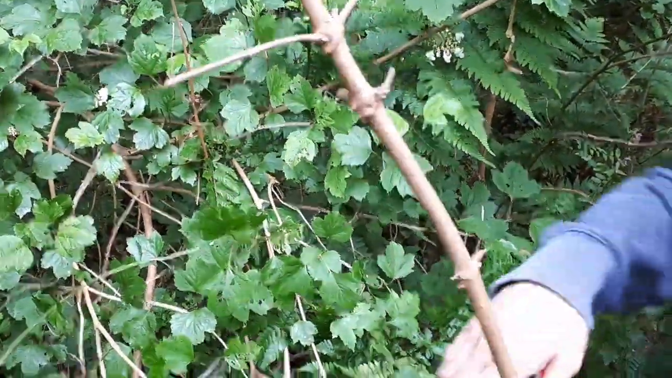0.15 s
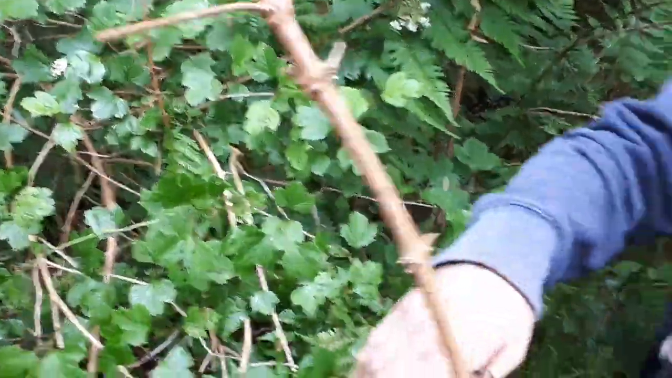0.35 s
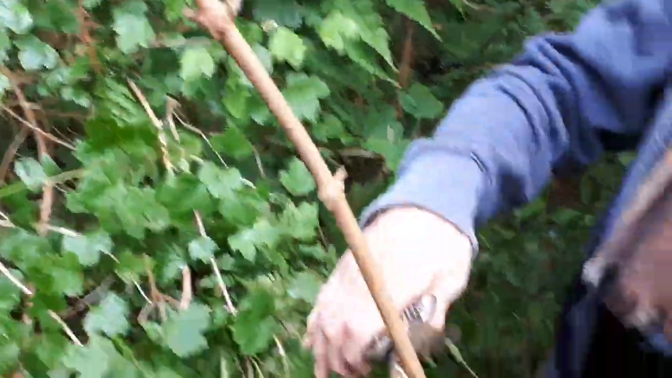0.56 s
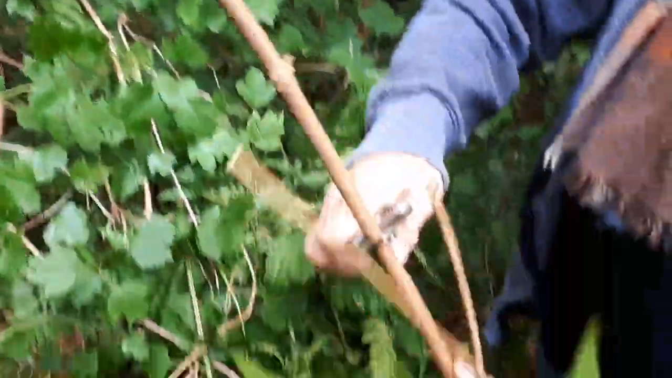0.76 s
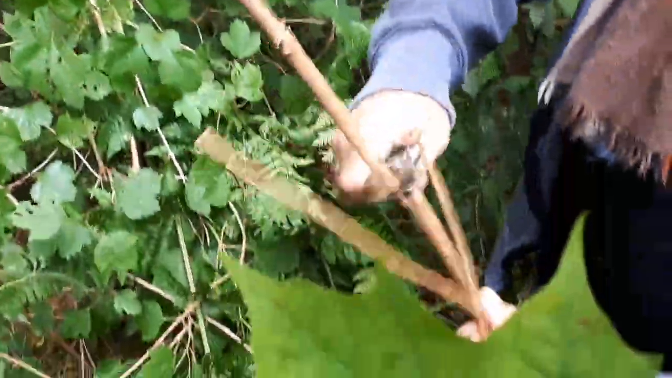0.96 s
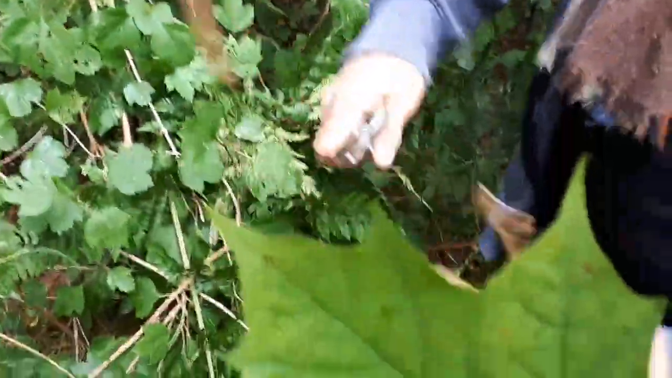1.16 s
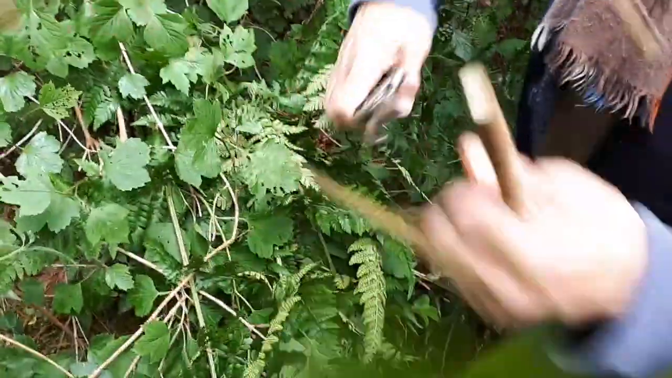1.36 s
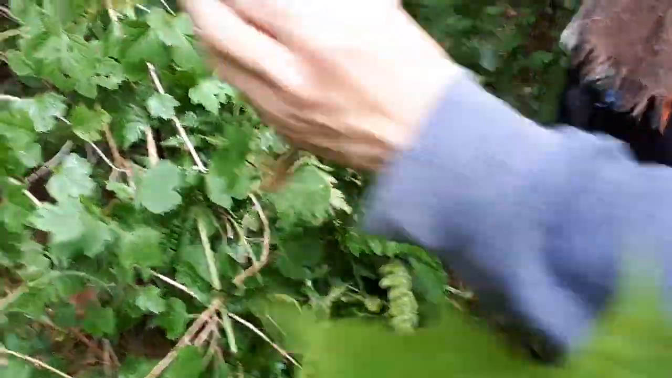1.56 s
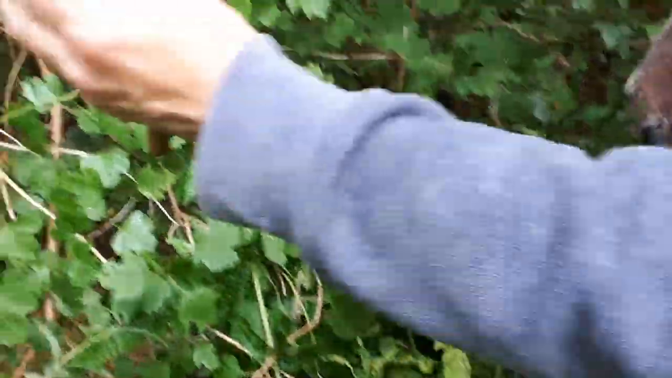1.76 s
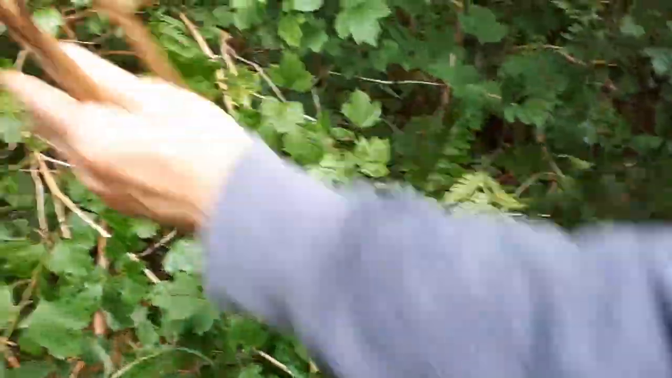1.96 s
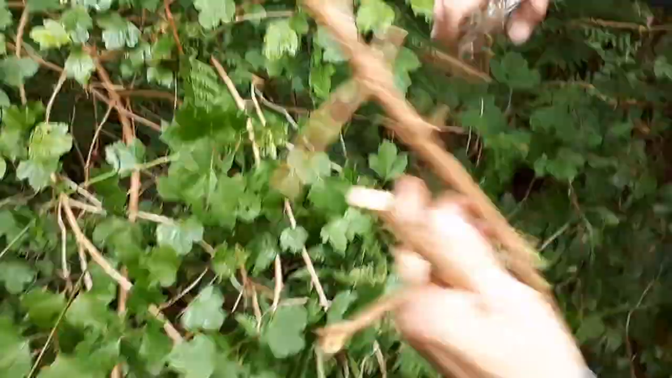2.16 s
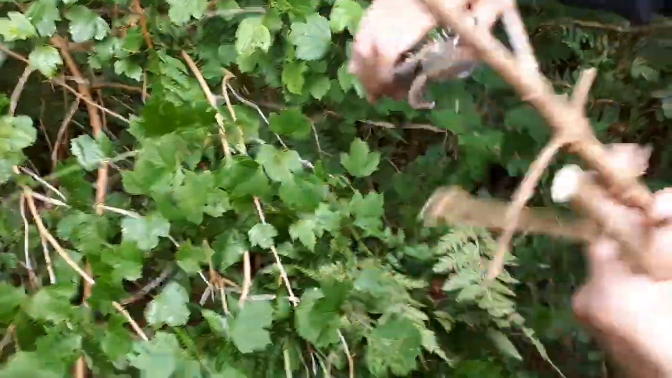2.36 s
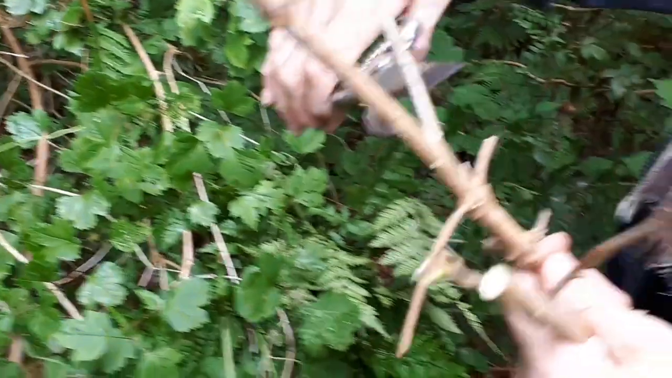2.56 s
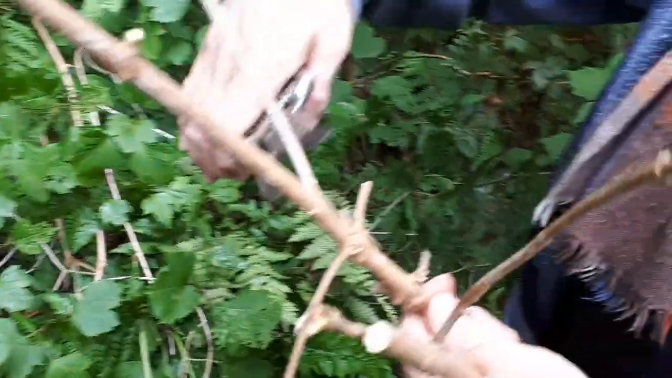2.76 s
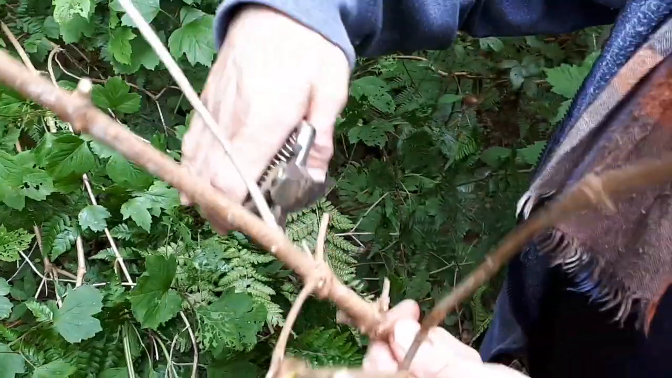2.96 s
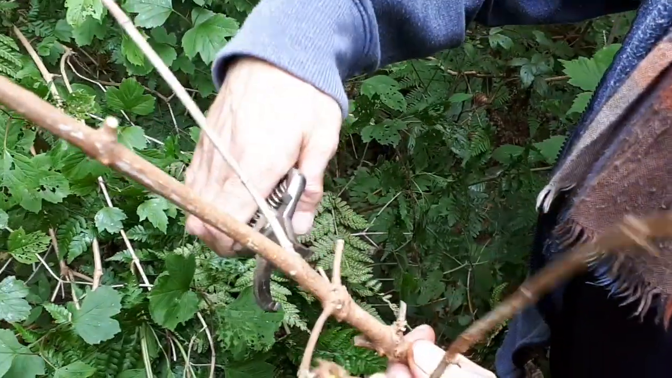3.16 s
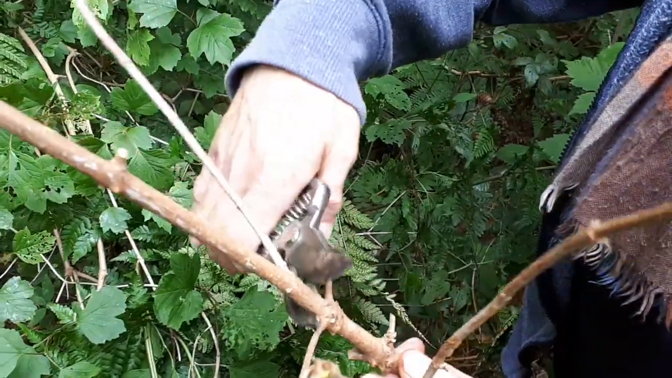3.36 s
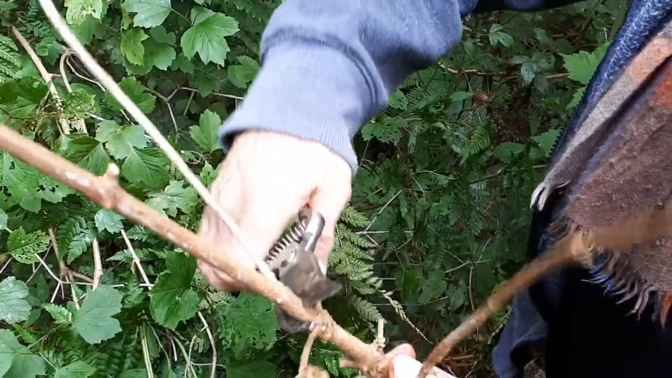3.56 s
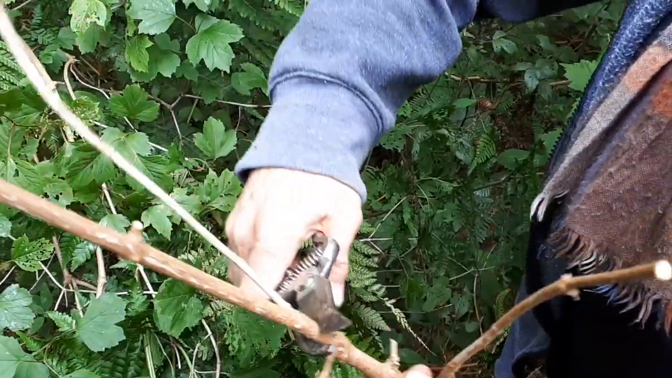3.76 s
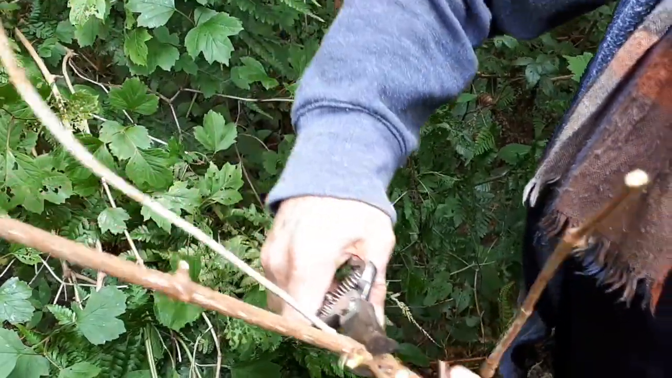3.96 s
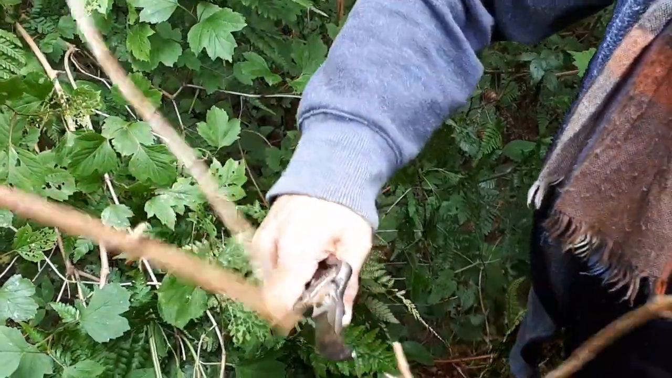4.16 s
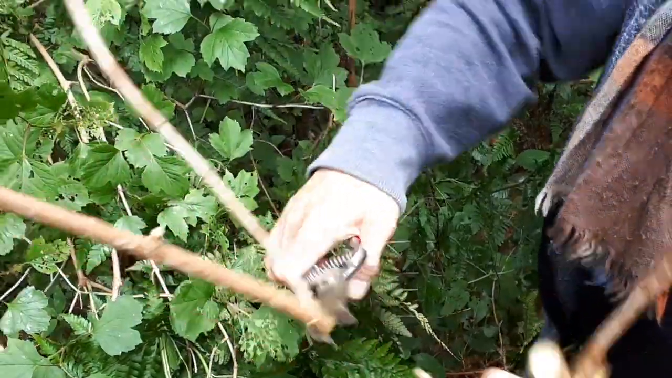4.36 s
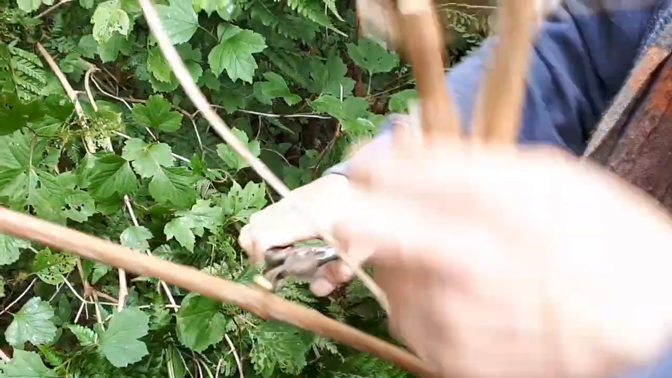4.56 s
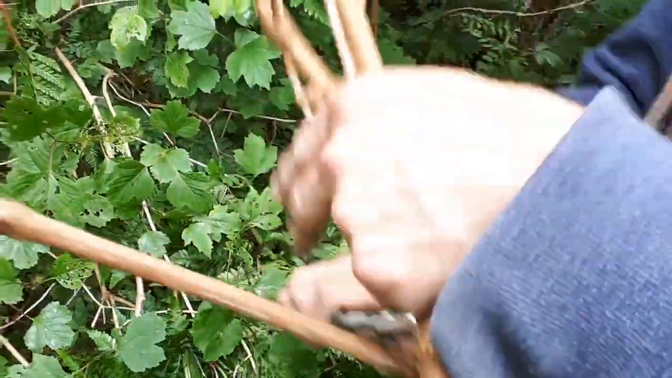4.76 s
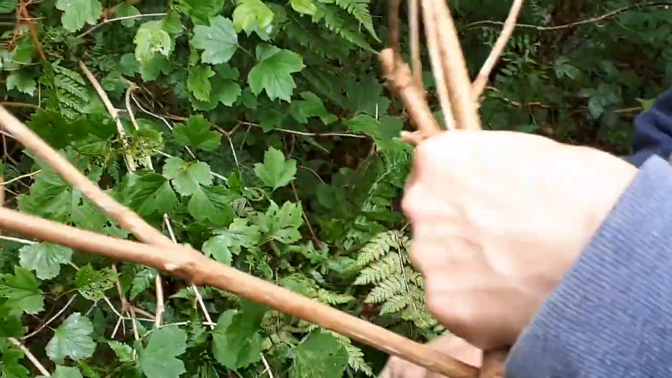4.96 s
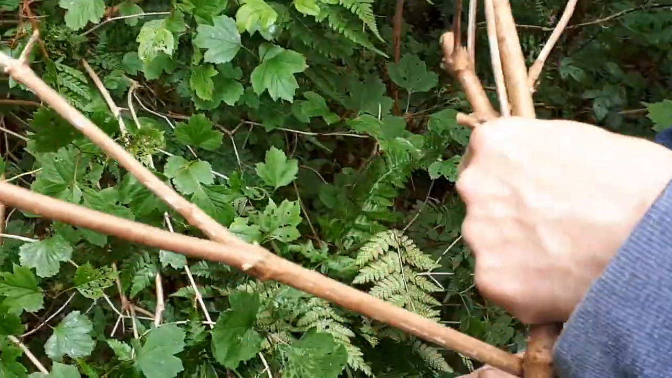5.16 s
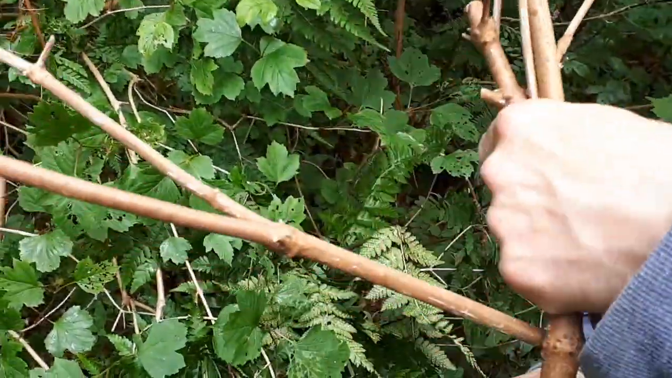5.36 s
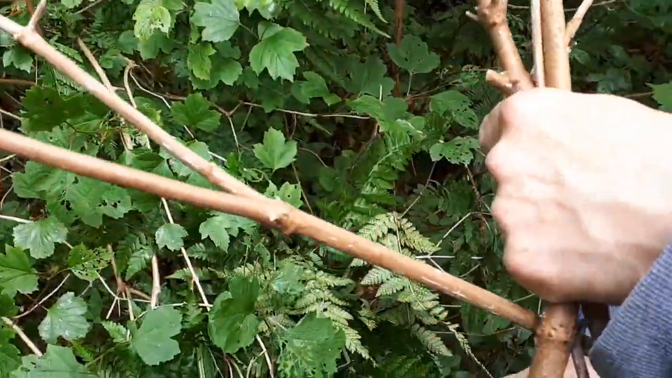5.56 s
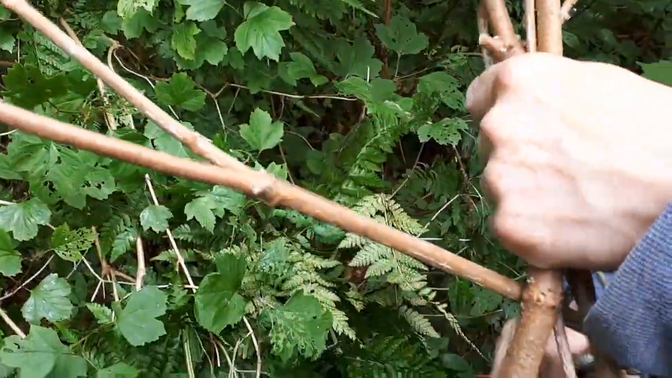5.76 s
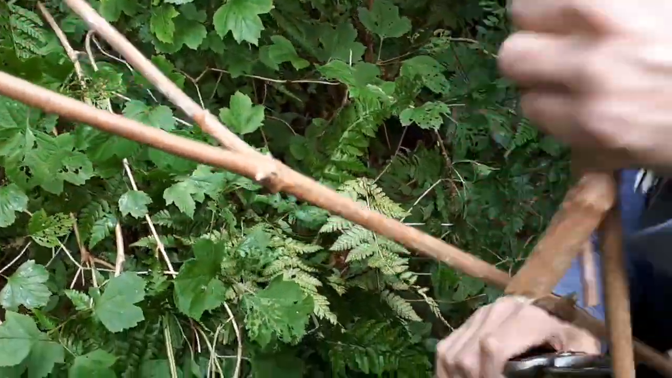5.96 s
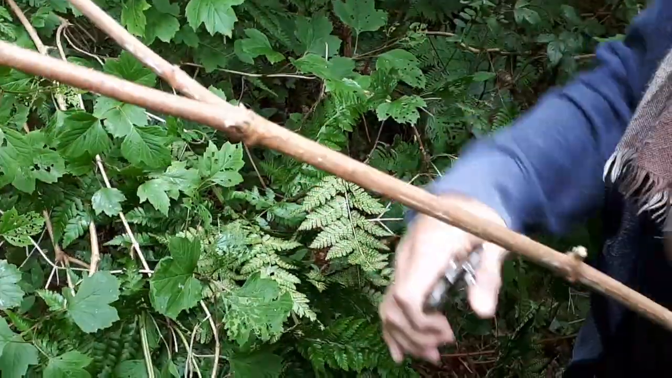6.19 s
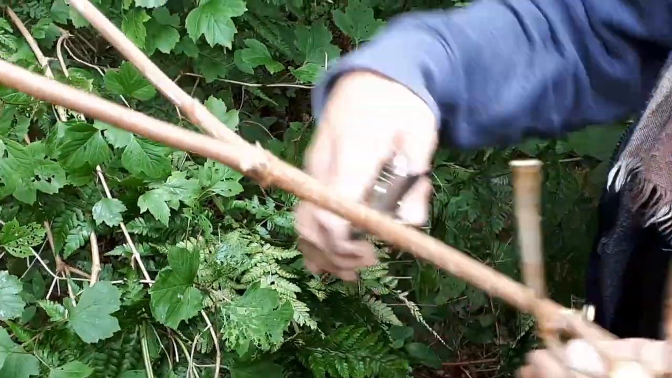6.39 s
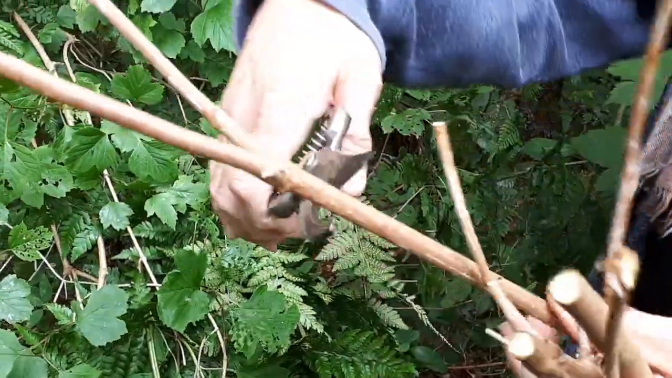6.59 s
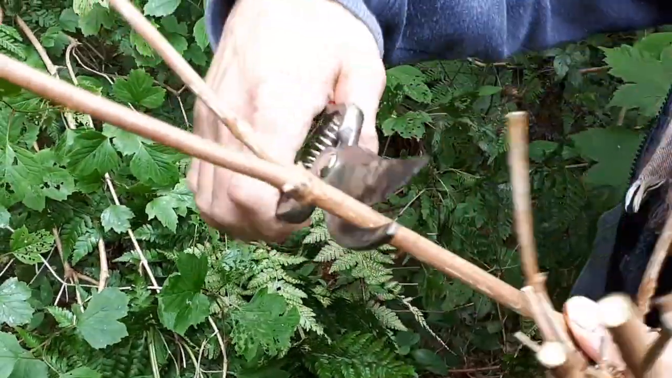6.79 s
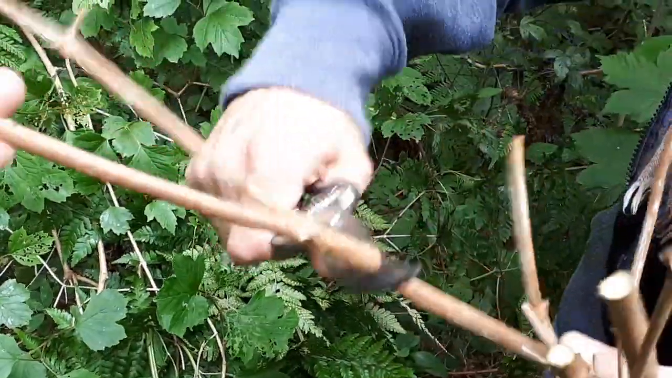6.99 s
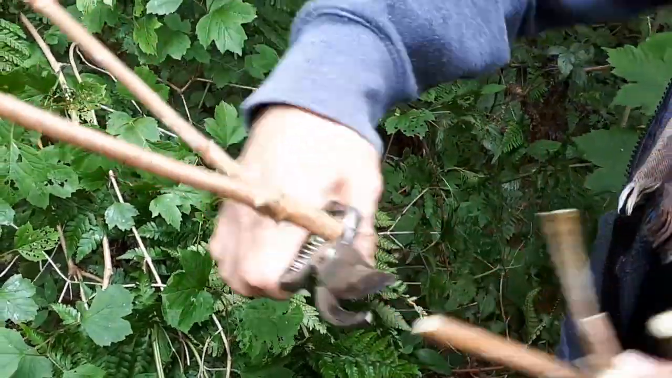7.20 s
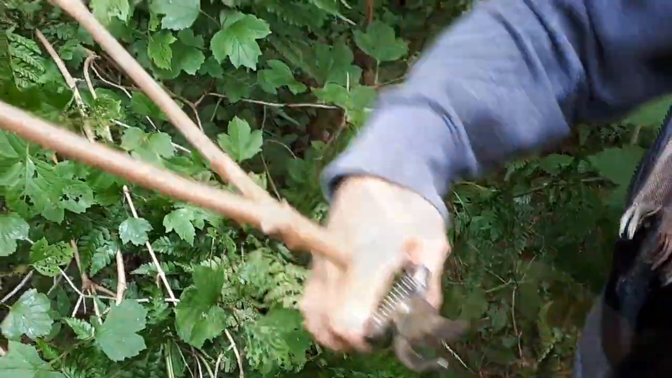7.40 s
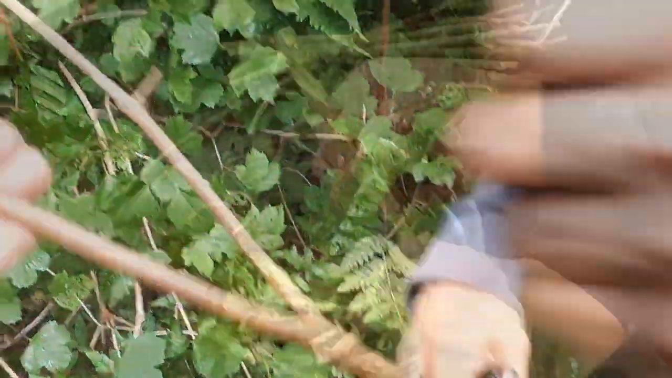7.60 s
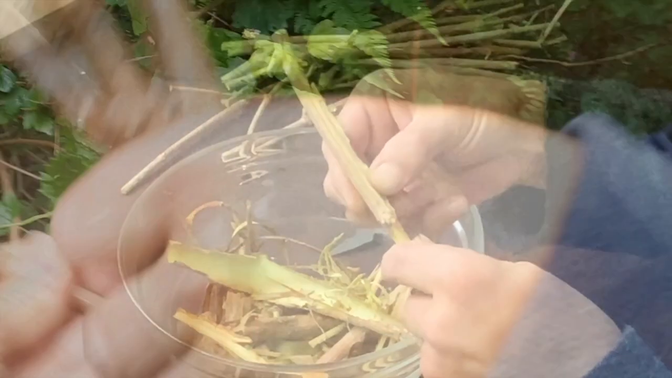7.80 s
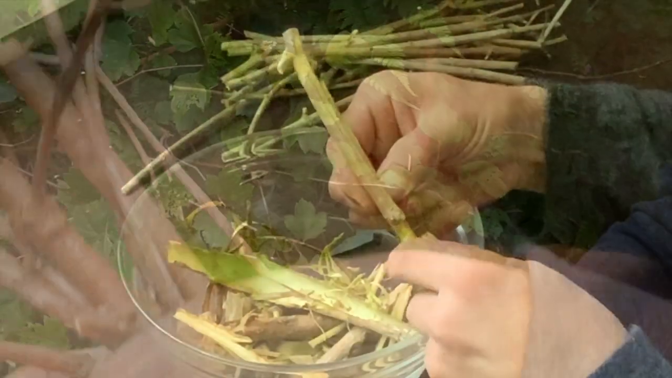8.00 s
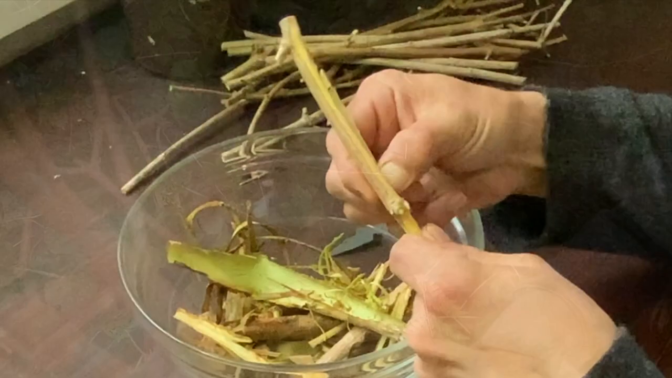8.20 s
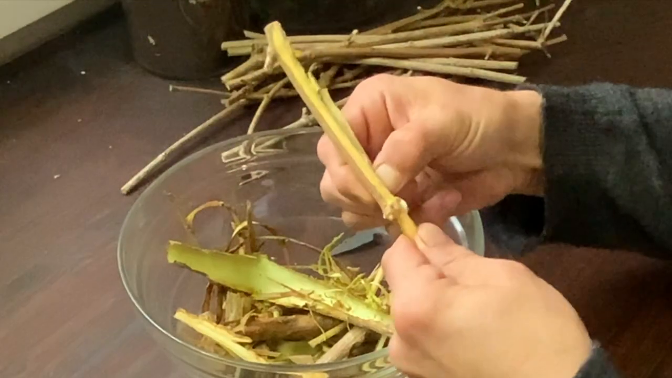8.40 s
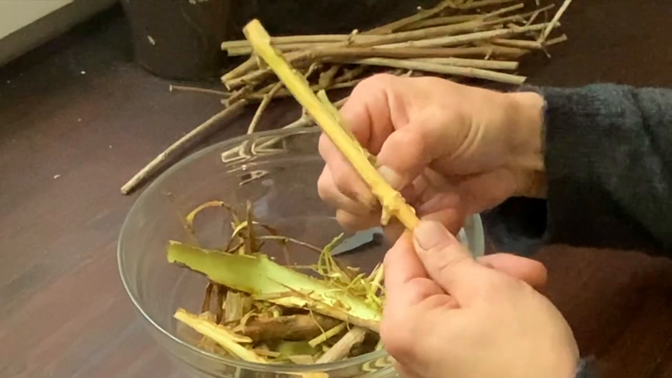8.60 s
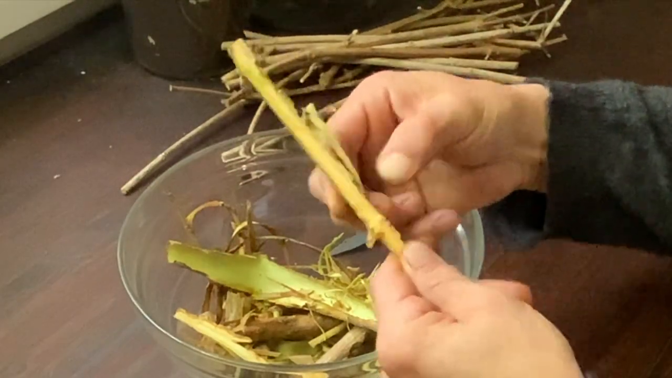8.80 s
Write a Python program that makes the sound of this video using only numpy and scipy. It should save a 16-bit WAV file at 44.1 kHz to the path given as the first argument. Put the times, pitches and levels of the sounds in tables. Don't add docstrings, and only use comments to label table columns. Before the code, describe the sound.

Close hand shears crunch through woody stems with sharp snaps over far road roar and rustling leaves, then bark cracks in a quiet room.

```python
import sys
import numpy as np
from scipy import signal
from scipy.io import wavfile
from scipy.ndimage import uniform_filter1d

SR = 44100
rng = np.random.default_rng(int(sys.argv[2]) if len(sys.argv) > 2 else 0)


def wav_out(sig):
    wavfile.write(sys.argv[1], SR, np.round(np.clip(np.atleast_2d(sig).T, -1, 1) * 32767).astype(np.int16))


def voltage_ratio(decibels):
    exponent = np.asarray(decibels, float) / 20
    return 10 ** exponent


N = 389844


def evened(x):
    return x / np.sqrt(np.mean(x ** 2) + 1e-20)


def read(points, hz):
    f, value = np.transpose(points)
    return np.interp(np.log(hz + 1), np.log(f + 1), value)


def curves(rows, t):
    s, *columns = np.transpose(rows)
    return [np.interp(t, s, c) for c in columns]


def add(mix, s, sound):
    part = mix[:, round(s * SR):][:, :sound.shape[1]]
    part += sound[:, :part.shape[1]]


def sides(db):
    return voltage_ratio(np.array([[db / 2], [-db / 2]]))


def noise(field, size, same, patchy_db, lean_db=0):
    hop = size // 4
    hz = np.fft.rfftfreq(size, 1 / SR)[:, None]
    t = np.arange(N // hop + 5) * hop / SR
    a, b, c, d, patch = rng.standard_normal((len(t), len(hz), 5), dtype=np.float32).T
    patch = uniform_filter1d(patch, size=size // 100, axis=0)
    patch = evened(uniform_filter1d(patch, size=3000 // hop, axis=1))
    same = np.clip(same, -1, 1)
    left = a + 1j * b
    right = same * left + np.sqrt(1 - same ** 2) * (c + 1j * d)
    pair = np.array([left * voltage_ratio(lean_db / 2), right * voltage_ratio(-lean_db / 2)])
    hiss_edge_hz = 15800
    z = pair * voltage_ratio(field(hz, t) + patchy_db * patch) * (hz < hiss_edge_hz)
    return signal.istft(z, nperseg=size, noverlap=size - hop)[1][:, :N] / size ** .5


def coloured(x, db):
    log_gain = np.log(voltage_ratio(np.maximum(np.r_[db, db[-2:0:-1]], -90)))
    taps = np.fft.ifft(np.exp(np.conj(signal.hilbert(log_gain)))).real
    return signal.fftconvolve(x, taps[None], axes=1)


def echoes(x, decays, start):
    taps = np.zeros((2, SR // 2))
    slots = np.arange(round(start * SR), SR // 2 - 16, 16)
    at = slots + rng.integers(0, 16, (2, len(slots)))
    np.put_along_axis(taps, at, rng.choice([-1., 1.], at.shape), 1)
    hz, t, z = signal.stft(taps, SR, nperseg=256)
    tail = signal.istft(z * voltage_ratio(-60 * t / read(decays, hz)[:, None]), SR, nperseg=256)[1]
    return signal.oaconvolve(x, tail / np.linalg.norm(tail[0]), axes=1)[:, :N]


def ring(modes, length):
    t = np.arange(round(length * SR)) / SR
    return sum(voltage_ratio(db - 60 * t / t60) * np.sin(2 * np.pi * hz * t) for hz, db, t60 in modes)[None]


def cracks(rows, body, ring_db, width, snap, apart, pan_db):
    mix = np.zeros((2, N))
    hz, t = np.fft.rfftfreq(1024, 1 / SR), np.arange(2000) / SR
    rise_s = 0.00028
    for s, db, ring_hz, bright_db, length in rows:
        common, own = rng.standard_normal((2, 2, len(t)))
        decay = voltage_ratio(-60 * t / max(length, .002))
        fibres = (common[:1] + apart * own) * decay * np.minimum(t / rise_s, 1)
        burst = fibres + snap * (t == 0)
        colour = read(body, hz) + ring_db / (1 + ((hz - ring_hz) / (width * ring_hz)) ** 2)
        colour = colour + (bright_db + 6.5) / (1 + (7000 / (hz + 1)) ** 4)
        sound = coloured(burst, colour)
        add(mix, s, voltage_ratio(db) * sides(pan_db) * sound / abs(sound).max())
    return mix


# time in seconds, roar level in dB.
ROAD_LEVEL = [(0.0, -42), (1.05, -41), (1.3, -45.5), (1.95, -43.5), (2.36, -36), (2.9, -36.5), (3.25, -33),
              (3.6, -35.5), (3.9, -33), (4.2, -39), (5.05, -38.5), (5.55, -30.5), (5.9, -34.5), (6.8, -33),
              (7.15, -38), (7.7, -44), (8.0, -52.5), (8.4, -69)]
# frequency in Hz, level in dB per Hz.
ROAR_COLOUR = [(18, -47.5), (30, -12.5), (70, -9), (124, -24.5), (194, -9.5), (282, -5.5), (351, -10.5),
               (520, -13), (684, -1.5), (849, 1), (1030, -6.5), (1230, -14.5), (1530, -13.5), (1870, -25.5),
               (3300, -44.5), (4290, -66), (7260, -120)]
# time in seconds, factor on its frequencies.
ROAR_SHIFT = [(0, 1.174), (1.9, 1.118), (2.3, 1.066), (4.9, 1.058), (5.4, 1.023), (8.4, 1.056)]
# frequency in Hz, likeness from 0 to 1.
ROAR_LIKENESS = [(60, 1), (150, 0.6), (380, 0.85), (700, .6), (1200, 0.087), (2400, 0.21)]
# frequency in Hz, left over right in dB.
ROAR_LEAN = [(60, -0.052), (180, -1.3), (550, 0.055), (1650, -0.83), (4970, -1.5), (15000, -1.4)]


def road():
    def field(hz, t):
        roar_db = curves(ROAD_LEVEL, t)[0]
        rumble_db = 0.5 - 0.11 * (roar_db + 40)
        hiss_db = -2.5 + 0.08 * (roar_db + 40)
        tilt_db = rumble_db / (1 + (hz / 450) ** 4) + hiss_db / (1 + (1300 / (hz + 1)) ** 4)
        return read(ROAR_COLOUR, hz / curves(ROAR_SHIFT, t)[0]) + roar_db + tilt_db
    hz = np.fft.rfftfreq(1024, 1 / SR)[:, None]
    roar = noise(field, size=1024, same=read(ROAR_LIKENESS, hz), patchy_db=1.16, lean_db=read(ROAR_LEAN, hz))
    fade_out = np.clip((ROAD_LEVEL[-1][0] - np.arange(N) / SR) / 0.27, 0, 1)
    return voltage_ratio(16.0) * roar * fade_out


# frequency in Hz, level in dB per Hz.
AIR_COLOUR = [(1470, -32.5), (2500, -6), (3370, -5.5), (3570, -13), (5800, -14), (6300, -2), (7800, 0),
              (8300, -13), (9350, -17), (15000, -12), (16500, -16)]
# frequency in Hz, level in dB per Hz.
ROOM_COLOUR = [(53, -32.5), (90, -1.5), (177, -13.5), (433, -14), (504, -16.5), (1670, -19.5),
               (2370, -24.5), (8770, -25.5), (15100, -14), (16500, -28.5)]
# time in seconds, share of the room from 0 to 1.
INDOOR_SHARE = [(7.3, 0.043), (8.3, 0.96)]
# frequency in Hz, rms level in dB.
MAINS_HUM = [(50, -77)]


def air():
    t = np.arange(N) / SR

    def outdoor_field(hz, t):
        return read(AIR_COLOUR, hz) - 82.5 - 1.14 * (curves(ROAD_LEVEL, t)[0] + 40)

    outdoor = noise(outdoor_field, size=512, same=.1, patchy_db=.6)
    indoor = evened(noise(lambda hz, t: read(ROOM_COLOUR, hz) + 0 * t, size=1024, same=.3, patchy_db=1))
    share = np.clip(curves(INDOOR_SHARE, t)[0], 0, 1)
    hum = sum(voltage_ratio(db) * 2 ** .5 * np.sin(2 * np.pi * hz * t) for hz, db in MAINS_HUM)
    room_db = -64.5
    return voltage_ratio(6.0) * outdoor * (1 - share) + voltage_ratio(room_db - 12.5) * indoor * share + hum


# start in seconds, hold in seconds, level in dB, release in dB per second.
SWISHES = [(0.0, 0.028, -62, 38), (0.175, 0.046, -63.5, 50), (0.397, 0.34, -69.5, 30),
           (0.756, 0.075, -65, 61), (0.934, 0.1, -63, 59.5), (1.182, .03, -71, 54), (2.1, .05, -71, 16),
           (2.3, 0.14, -72, 12), (2.949, .3, -76, 21), (3.3, 0.21, -75, 7), (3.581, .05, -71, 21),
           (3.955, 0.1, -64, 60), (4.196, 0.073, -76, 50), (4.837, .01, -76.5, 60),
           (5.267, 0.13, -74.5, 15), (5.69, 0.23, -66, 60), (6.051, 0.11, -72.5, 15),
           (6.501, 0.24, -76, 23), (6.755, .04, -67, 198), (6.855, 0.23, -64.5, 68), (7.198, 0.2, -77, 30),
           (7.38, 0.054, -73, 37)]
# frequency in Hz, level in dB per Hz.
LEAF_COLOUR = [(1180, -28.5), (2000, 0.5), (2950, -16.5), (4240, -6), (5900, -10.5), (6500, -7),
               (7850, -6.5), (8300, -13.5), (15100, -11), (16100, -18), (16500, -29)]


def rustle():
    t = np.arange(0, N / SR + .01, .005)
    level_db = -80
    for s, hold, db, release_db in SWISHES:
        before_db = 3.9 * release_db * (s - t)
        after_db = release_db * (t - s - hold)
        away_db = np.maximum(before_db, after_db)
        level_db = np.maximum(level_db, db - np.maximum(away_db, 0))
    outdoor_end_s = 7.75
    level_db = level_db - 40 * np.clip(t - outdoor_end_s, 0, 1) / .2
    level_db = np.interp(np.arange(N) / SR, t, level_db)
    slip_size = voltage_ratio(2.0 * np.minimum(rng.exponential(1, (2, N)), 4))
    slips = slip_size * (rng.random((2, N)) < 150 / SR)
    flicker = 1 + .25 * signal.lfilter([1], [1, -.994], slips + .5 * slips[::-1])
    swish = noise(lambda hz, t: read(LEAF_COLOUR, hz) + 0 * t, size=256, same=.1, patchy_db=.9)
    return voltage_ratio(level_db + 2.5) * evened(swish * flicker)


# frequency in Hz, level in dB per Hz.
GREEN_WOOD = [(350, -40), (600, -12), (910, -7.5), (1360, -12.5), (1750, -9), (3260, -6.5), (3590, -8.5),
              (5010, -6.5), (7700, -4), (9220, -12.5), (12000, -1.5), (13200, -9), (15400, -7),
              (16500, -25.5)]


def ticks(rows, pan_db):
    tick_s = 0.024
    rows = [(*row, tick_s) for row in rows]
    return cracks(rows, GREEN_WOOD, ring_db=12.5, width=0.2, snap=2.6, apart=1.7, pan_db=pan_db)


# start in seconds, peak in dB, ring in Hz, brightness in dB.
REACH_TICKS = [(0.0024, -34.5, 7460, 6), (0.0904, -38, 7350, 0), (0.107, -41.5, 7050, -24),
               (0.182, -45, 13000, 0), (.195, -45, 7400, -3), (.245, -52, 7000, -3), (0.2229, -43, 6000, 1),
               (.266, -49, 6500, -10), (0.4364, -47, 7600, -18), (.518, -54, 7800, -15),
               (0.537, -50, 5420, -20), (.585, -61, 11000, -8), (0.6081, -50, 4200, -18),
               (0.723, -48.5, 6950, -6), (.765, -52, 5800, -19), (.79, -50, 5000, -9),
               (0.8021, -39, 5550, -3), (.82, -50, 5200, -10), (.845, -51.5, 5300, -7),
               (2.251, -48, 2700, -38), (3.598, -52, 6460, -12), (3.6207, -50, 6800, -27),
               (3.7044, -51, 4880, -21), (6.7635, -49.5, 5000, -25), (6.7685, -47, 10500, -14),
               (6.771, -49, 4300, -24), (6.7955, -42.5, 11300, -22), (6.8505, -31.5, 5200, -2),
               (6.8545, -35, 9900, -3.5), (6.9, -48.5, 4500, -18.5), (6.917, -51.5, 12000, -8),
               (7.335, -57, 6000, -1), (7.39, -55, 7600, 1), (7.4244, -60, 14000, -4)]


def reaching_twigs():
    return ticks(REACH_TICKS, pan_db=-7)


# frequency in Hz, time to fall by 60 dB in seconds.
HEDGE_DECAY = [(1000, 0.45), (3000, 0.33), (7000, 0.19), (14000, 0.29)]


def hedge_scatter(x):
    return voltage_ratio(-15.0) * echoes(x, HEDGE_DECAY, start=0.004)


# start in seconds, peak in dB, ring in Hz, brightness in dB, length in seconds.
STEM_CRACKS = [(.9345, -30, 6000, -12.5, 0.014), (.9374, -17.5, 6500, -11.5, 0.019),
               (.9402, -18.5, 12000, -8.5, 0.011), (.9416, -0.5, 4000, -10.5, 0.0052),
               (.9428, -8, 5670, -13.5, .02), (.9456, -12, 2900, -13, 0.015),
               (.9505, -17.5, 4200, -9.5, .03), (.956, -23, 4320, -9, 0.032), (3.9525, -28, 4000, -12, .01),
               (3.9542, -21.5, 4500, -9.5, .012), (3.9568, -13.5, 6000, -9.5, 0.011),
               (3.9582, -1.5, 3500, -11, 0.0066), (3.9594, -5, 2120, -9.5, 0.015),
               (3.9627, -7, 5500, -10.5, .012), (3.965, -16.5, 2300, -11.5, 0.018),
               (3.9695, -23, 4000, -8, 0.022), (6.9395, -33.5, 4030, -8.5, .01),
               (6.9419, -13, 4600, -8, 0.011), (6.9468, -4.5, 7800, -9.5, 0.0088),
               (6.948, -5, 4500, -12, 0.01), (6.9505, -11, 3000, -12, 0.0054),
               (6.9528, -8.5, 3300, -10, 0.0095), (6.9538, -11, 4800, -12.5, .016),
               (6.958, -16, 5930, -12, 0.016), (6.964, -25.5, 3200, -10, .04)]


def green_cuts():
    return cracks(STEM_CRACKS, GREEN_WOOD, ring_db=5.5, width=0.15, snap=0.69, apart=2.4, pan_db=-1.5)


# frequency in Hz, level in dB, time to fall by 60 dB in seconds.
BLADE_TONES = [(2265, -1.5, 0.095), (2900, -2, .05), (4100, -9.5, .05), (5900, -12, .035),
               (7600, -10, .035), (11650, -3, 0.055)]


def blade_ring(dry_twig, stems):
    return voltage_ratio(-40.0) * signal.oaconvolve(dry_twig + .3 * stems, ring(BLADE_TONES, .08), axes=1)[:, :N]


# time of the push in seconds, peak in dB, left over right in dB, share of suction.
PUFFS = [
    (.9436, -22.5, -13.5, 0.73),
    (1.1836, -31.5, 0.5, 0.27),
    (3.96, -17, -14, 0.44),
    (5.7406, -34.5, -15, .9),
    (6.9496, -19, -15, .5),
]


def knocks():
    mix, t = np.zeros((2, N)), np.arange(400) / SR - .004
    suction_lead_s, suction_s, push_s = .0016, .0005, .00075
    for s, db, pan_db, suction in PUFFS:
        push = np.exp(-(t / push_s) ** 2)
        puff = push - suction * np.exp(-((t + suction_lead_s) / suction_s) ** 2)
        add(mix, s + t[0], voltage_ratio(db) * sides(pan_db) * puff[None])
    return mix


# start in seconds, peak in dB, ring in Hz, brightness in dB.
BITE_TICKS = [(1.1818, -29.5, 3050, -30), (1.1821, -32, 7400, -26), (1.1885, -44.5, 2600, -40),
              (1.2, -37.5, 1800, -37), (1.2015, -50, 3400, -30), (1.2125, -50, 4300, -34),
              (1.2155, -51, 2490, -34), (1.2357, -50, 2290, -20), (1.255, -54, 2560, -22),
              (1.2895, -55, 2910, -37), (4.83, -48.5, 2618, -35.5), (5.6616, -52, 7630, -5),
              (5.6667, -37.5, 11300, -19.5), (5.7015, -33.5, 7040, -14.5), (5.8, -44, 2800, -25),
              (5.905, -48, 7360, -3), (6.7544, -39, 5160, -22), (6.8722, -35.5, 5470, -3),
              (7.121, -51, 4380, -38)]


def bites():
    return ticks(BITE_TICKS, pan_db=2)


# start in seconds, length in seconds,
# start in Hz, end in Hz, level in dB.
BIRD_NOTES = [(3.394, 0.024, 4270, 4290, -63), (3.62, .07, 5300, 4770, -72), (3.66, .06, 4900, 4800, -71),
              (3.728, 0.099, 4530, 4400, -70), (4.39, 0.15, 7800, 7450, -79), (5.32, 0.23, 5450, 4370, -67),
              (6.0, 0.31, 7310, 6920, -68.5), (7.12, 0.3, 5050, 4900, -73), (7.142, 0.21, 7320, 6650, -76),
              (7.524, .17, 6270, 6590, -77), (3.022, .3, 15600, 15500, -74)]


def bird():
    mix = np.zeros((2, N))
    for s, length, from_hz, to_hz, db in BIRD_NOTES:
        u = np.arange(round(length * SR)) / (length * SR)
        hoarse = 1 + .03 * evened(uniform_filter1d(rng.standard_normal(len(u)), size=120))
        hz = (to_hz + (from_hz - to_hz) * (1 - u) ** 1.5) * hoarse
        whistle = np.sin(2 * np.pi * np.cumsum(hz) / SR)
        add(mix, s, (voltage_ratio(db) * whistle * np.sin(np.pi * u))[None])
    return mix


# start in seconds, peak in dB, ring in Hz, brightness in dB, length in seconds.
TWIG_CRACKS = [(5.7313, -19.5, 7470, -7.5, .012), (5.7397, -3.5, 7600, -6.5, .007),
               (5.7424, -16.5, 11280, -9, .008), (5.7445, -13, 5900, -9.5, .008),
               (5.7482, -22, 5900, -11, .006), (5.7495, -3.5, 5900, -11, .008),
               (5.7525, -17.5, 7500, -11, .012), (5.755, -21, 2800, -13.5, .015)]
# frequency in Hz, level in dB per Hz.
DRY_WOOD = [(500, -41), (900, -15), (1600, -21.5), (2300, -11.5), (3210, -15.5), (4810, -17), (5820, -3.5),
            (7590, -2.5), (8360, -18.5), (11500, -10), (13000, -17), (15400, -18.5), (16500, -27)]


def dry_cut():
    return cracks(TWIG_CRACKS, DRY_WOOD, ring_db=5.0, width=.15, snap=1.6, apart=1.6, pan_db=-3.5)


# time in seconds, pitch in Hz, rms level in dB.
SQUEAK = [(7.13, 13100, -92), (7.235, 15100, -86), (7.33, 14700, -92), (7.38, 14000, -85),
          (7.46, 14400, -92), (7.56, 13000, -90), (7.6, 13700, -84), (7.67, 14050, -84),
          (7.725, 11700, -92)]


def spring():
    mix, t = np.zeros((2, N)), np.arange(SQUEAK[0][0], SQUEAK[-1][0], 1 / SR)
    hz, db = (uniform_filter1d(c, size=1200) for c in curves(SQUEAK, t))
    add(mix, t[0], (voltage_ratio(db + 3) * np.sin(2 * np.pi * np.cumsum(hz) / SR))[None])
    return mix


# start in seconds, peak in dB, ring in Hz, brightness in dB, length in seconds.
BARK_CRACKS = [(7.824, -61, 10870, -5, 0.033), (7.844, -55, 11000, -11, .006),
               (7.9244, -33, 12100, 1, 0.0051), (7.97, -46, 6000, -2, .02), (8.105, -57, 12240, -6, .0059),
               (8.2076, -33, 13900, -16, 0.014), (8.219, -52, 12970, -10, 0.083),
               (8.713, -54, 2700, -16, 0.072), (8.797, -58, 2820, -20, 0.055), (8.803, -61, 12160, -5, .06),
               (8.82, -55, 12000, -5, 0.064)]
# frequency in Hz, level in dB per Hz.
BARK_COLOUR = [(180, -84), (300, -49.5), (587, -18), (1000, -23.5), (6900, -7), (10100, 1), (15800, 3.5),
               (16900, -30)]


def bark():
    return cracks(BARK_CRACKS, BARK_COLOUR, ring_db=9., width=.2, snap=6., apart=.4, pan_db=.5)


# frequency in Hz, time to fall by 60 dB in seconds.
ROOM_DECAY = [(500, 0.26), (2000, 0.31), (6000, 0.29), (14000, 0.17)]


def room_walls(x):
    return voltage_ratio(-5.5) * echoes(x, ROOM_DECAY, start=0.0044)


# start in seconds, peak in dB.
BOWL_TAPS = [
    (8.301, -56),
    (8.487, -58),
]
# frequency in Hz, level in dB, time to fall by 60 dB in seconds.
TWIG_TONES = [(330, -9, .02), (450, 0, .015), (720, 0, .012), (1030, 0, .012), (1300, -2, .012)]


def taps():
    mix, n = np.zeros((2, N)), np.arange(1500)
    bowl = signal.butter(3, [330, 1350], "bandpass", fs=SR, output="sos")
    for s, db in BOWL_TAPS:
        blow = rng.standard_normal((1, 1500)) * np.exp(-n / 450) * np.minimum(n / 90, 1)
        sound = signal.sosfilt(bowl, signal.fftconvolve(blow, ring(TWIG_TONES, .1), axes=1))
        add(mix, s, voltage_ratio(db + 2.) * sound / abs(sound).max())
    return mix


# start in seconds, peak in dB, ring in Hz, brightness in dB, length in seconds.
STRIP_CRACKS = [(8.4665, -50.5, 3120, -26.5, 0.088), (8.4886, -5.5, 11800, -5, 0.0021),
                (8.4892, -19, 2900, -24, 0.0071), (8.4912, -21, 11000, -14, .008),
                (8.4932, -28, 2720, -23, 0.013), (8.4995, -25, 10500, -13, .015),
                (8.505, -37, 9530, -9, .05), (8.5195, -31, 5650, -23, .004), (8.5214, -17, 11060, -6, .003),
                (8.5222, -35, 2800, -23, .008), (8.53, -40, 11000, -11, .04), (8.5413, -15, 10900, 1, .004),
                (8.5416, -27, 5600, -15, 0.0064), (8.5483, -23, 12100, -6, 0.0035),
                (8.553, -45, 10530, -10, .06)]
# frequency in Hz, level in dB per Hz.
TEAR_COLOUR = [(200, -41), (650, -19), (1250, -28), (2600, -18.5), (4200, -21), (7000, -13), (10500, -7.5),
               (13500, -7), (15800, -6), (16900, -22)]


def long_strip():
    return cracks(STRIP_CRACKS, TEAR_COLOUR, ring_db=8.5, width=0.2, snap=4.3, apart=0.92, pan_db=1.0)


def scene():
    background = road() + air() + rustle()
    twigs = reaching_twigs() + bites()
    stems, dry_twig = green_cuts(), dry_cut()
    far = 3 * bird()
    hedge = stems + dry_twig + blade_ring(dry_twig, stems) + twigs + knocks() + 0.2 * far + spring()
    scatter = hedge_scatter(stems + twigs + 0.56 * dry_twig + far)
    room = bark() + taps() + long_strip()
    table = .45 * np.roll(room, round(.0011 * SR), axis=1)
    return background + hedge + scatter + room + table + room_walls(room)


def band_limit(x):
    return signal.sosfilt(signal.butter(12, 16990, fs=SR, output="sos"), x)


def record(dry):
    bass_cut = signal.butter(3, 46, "highpass", fs=SR, output="sos")
    soft = 1.1 * np.tanh(signal.sosfilt(bass_cut, dry) / 1.1)
    edge = signal.firwin(255, 16200, window=("kaiser", 4.5), fs=SR)[None]
    return band_limit(signal.oaconvolve(soft, edge, "same", axes=1))


dry = scene()
out = record(dry)
wav_out(out)
```